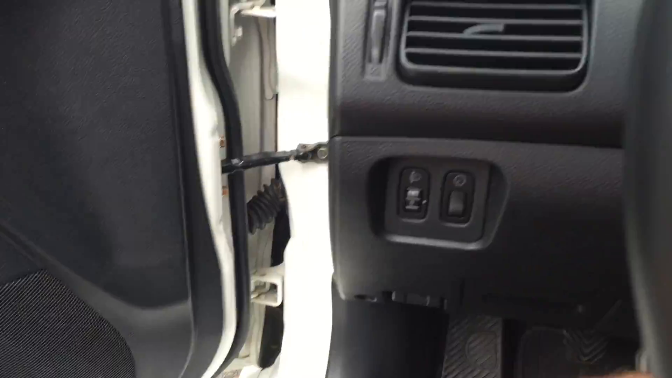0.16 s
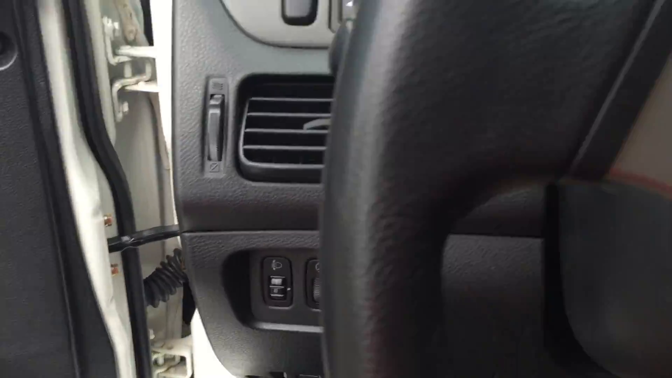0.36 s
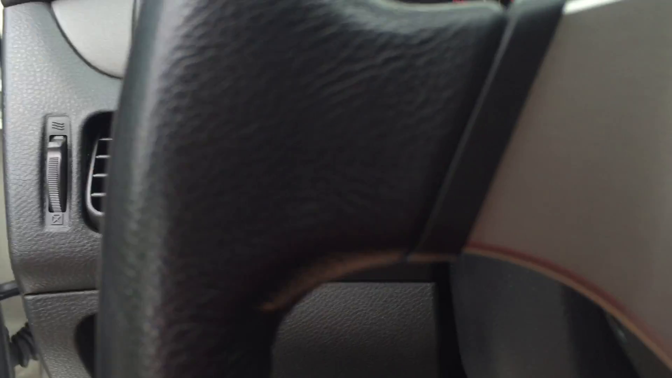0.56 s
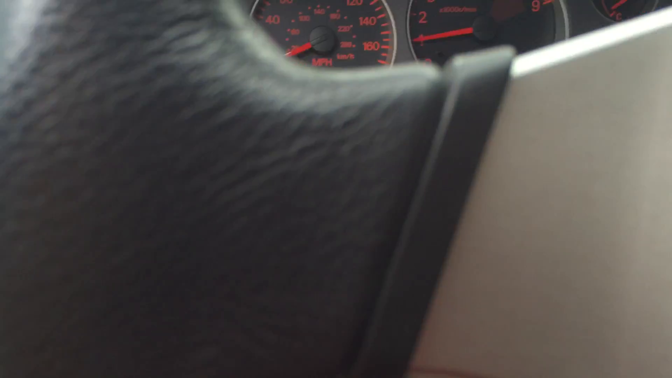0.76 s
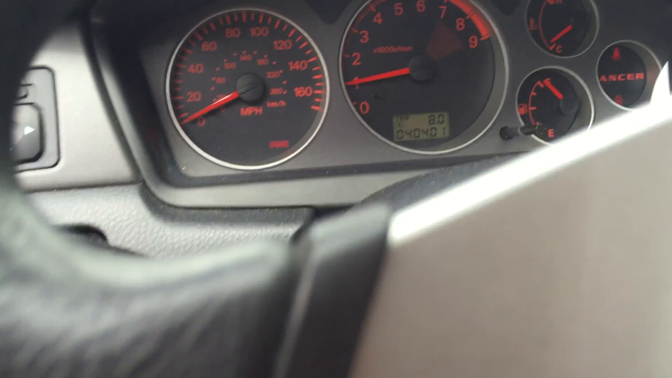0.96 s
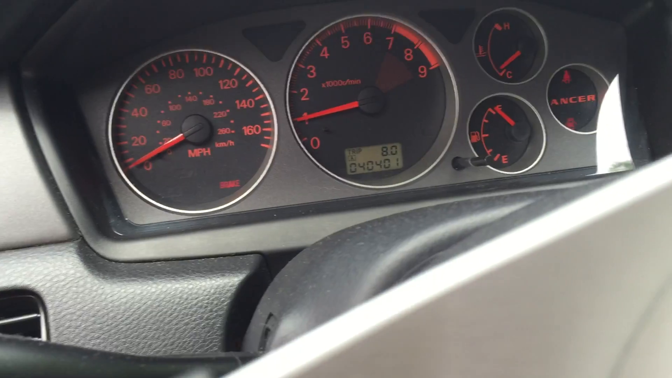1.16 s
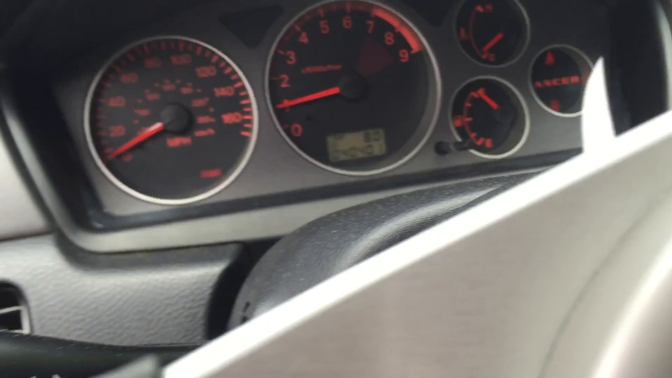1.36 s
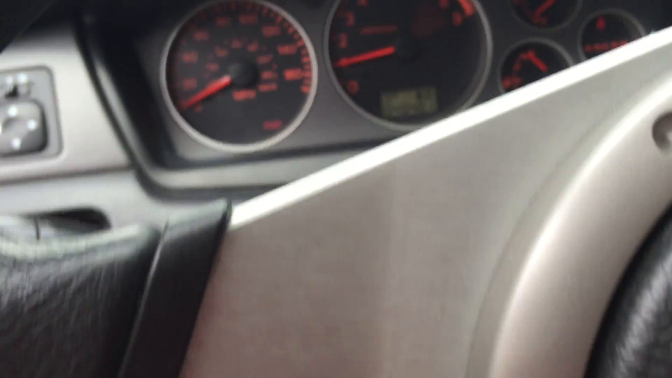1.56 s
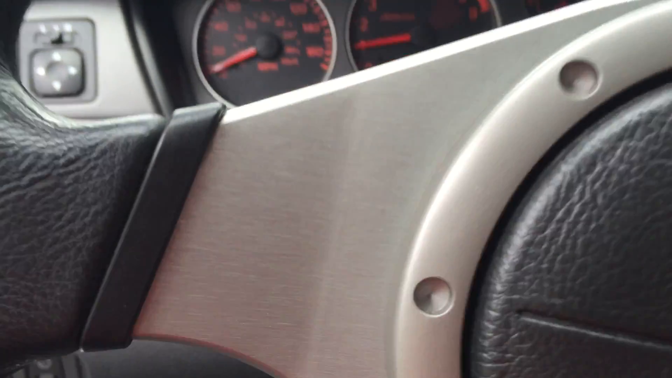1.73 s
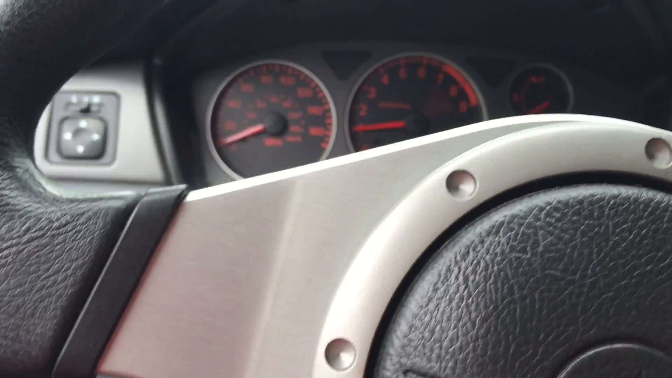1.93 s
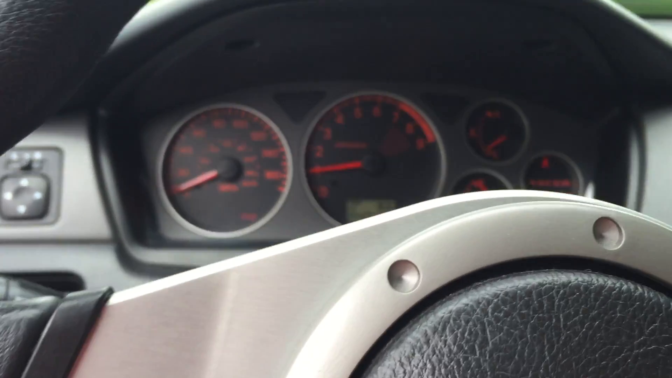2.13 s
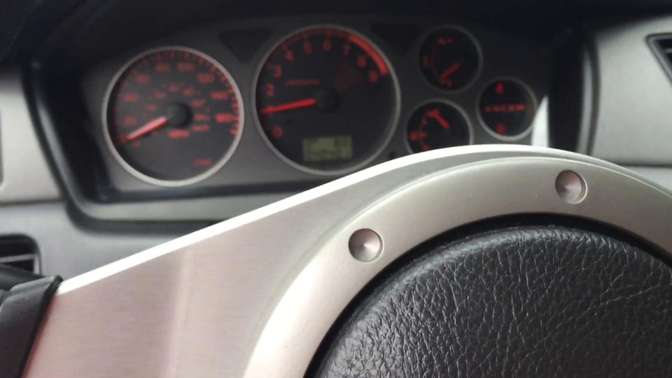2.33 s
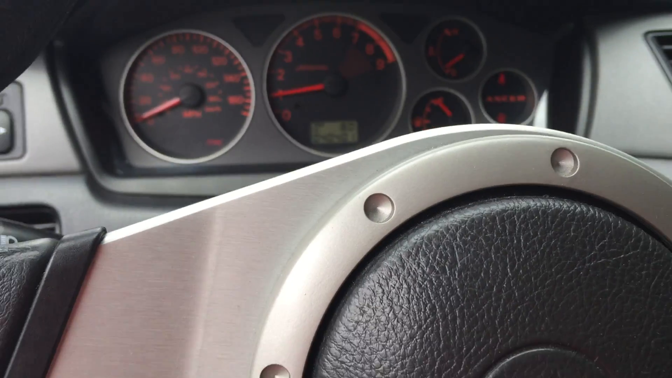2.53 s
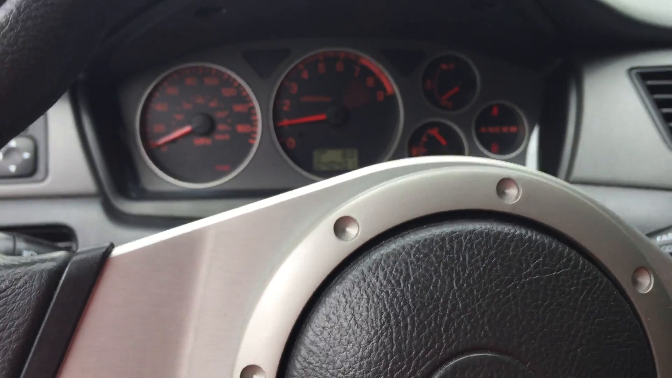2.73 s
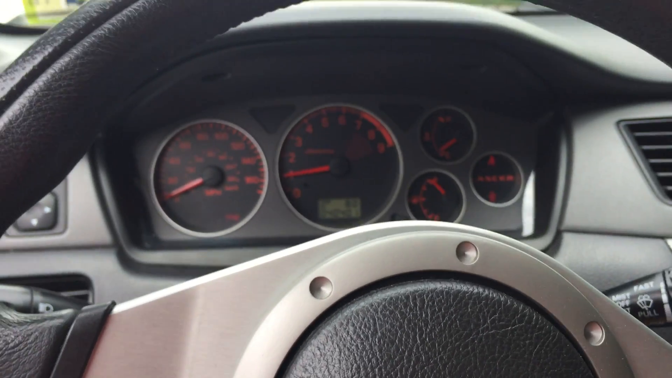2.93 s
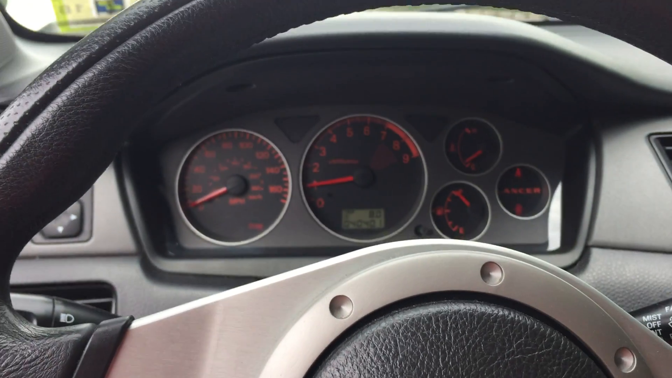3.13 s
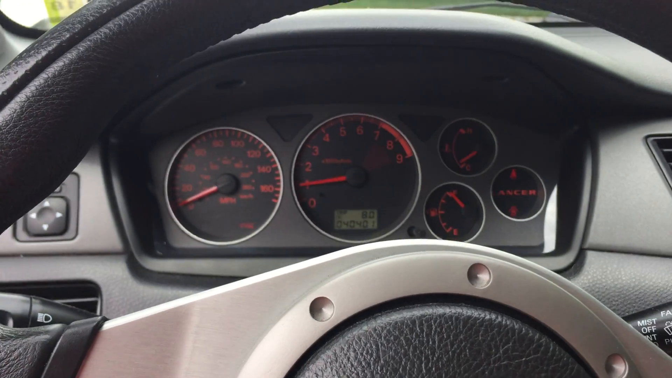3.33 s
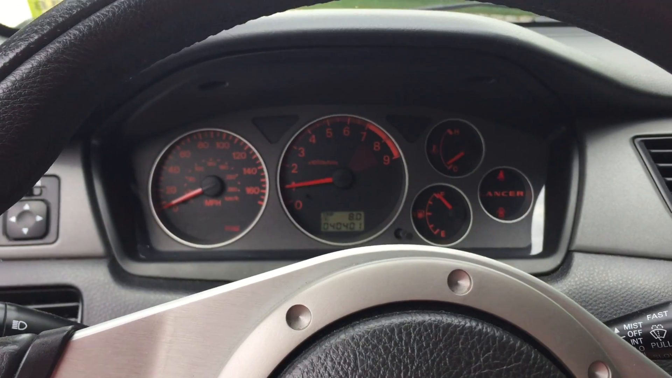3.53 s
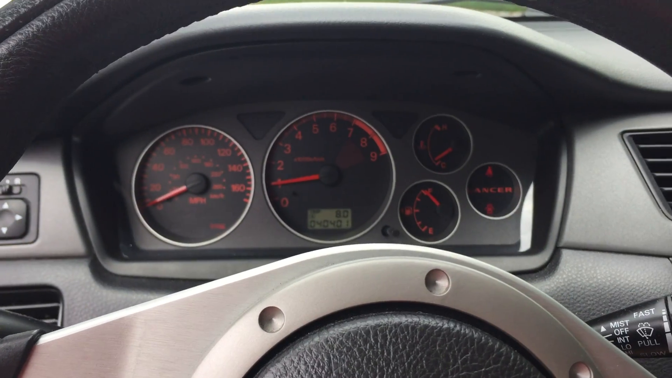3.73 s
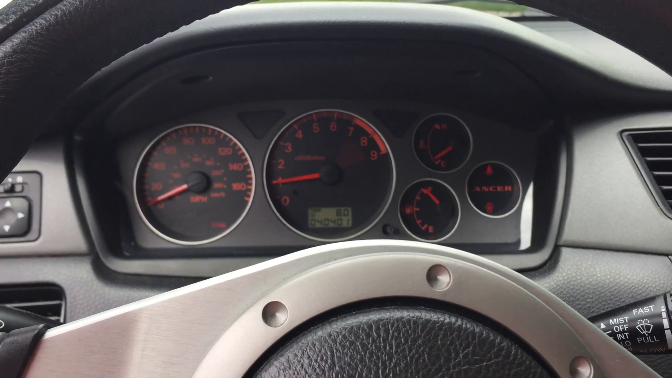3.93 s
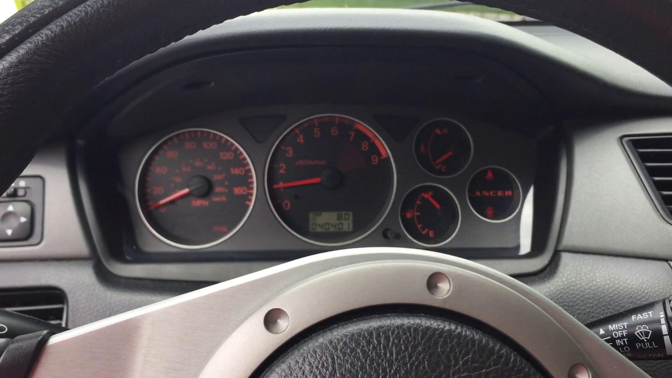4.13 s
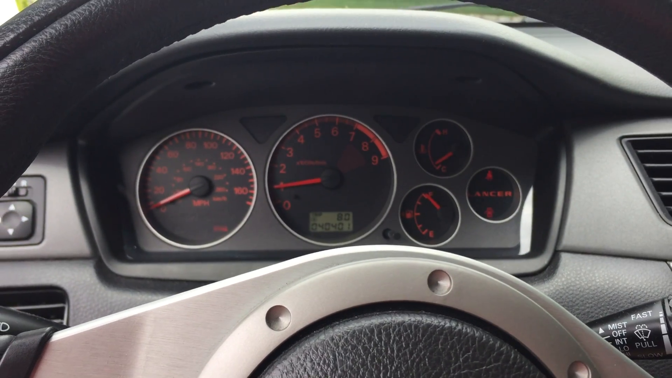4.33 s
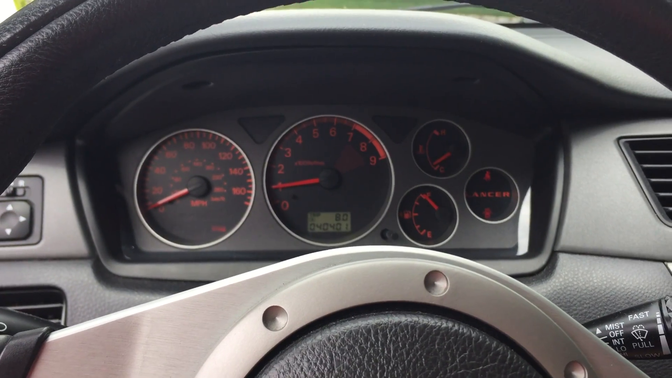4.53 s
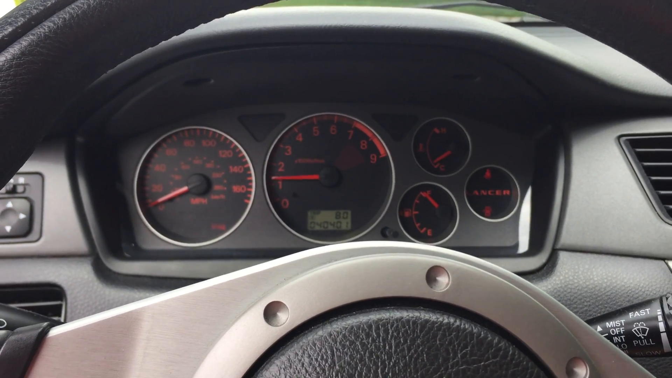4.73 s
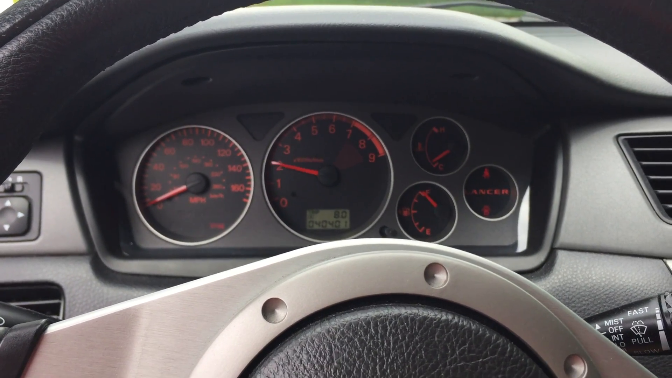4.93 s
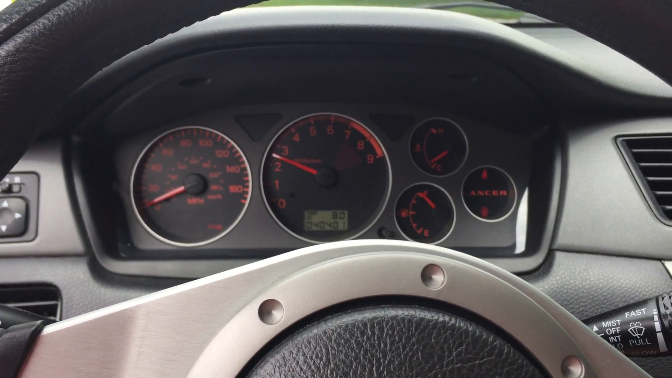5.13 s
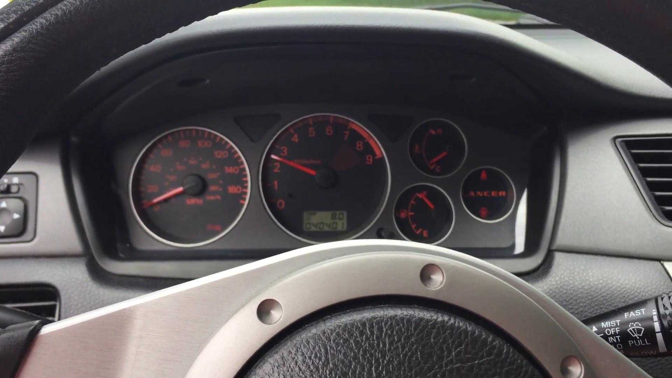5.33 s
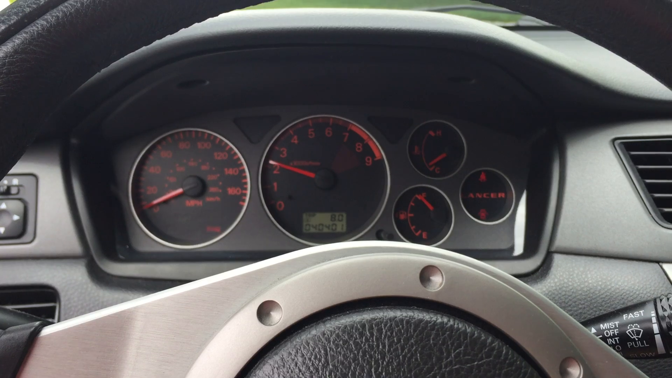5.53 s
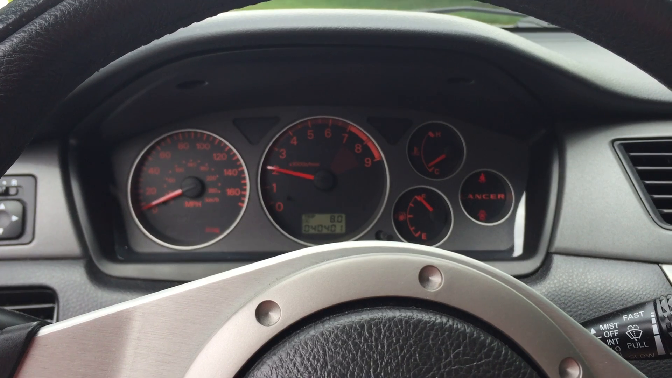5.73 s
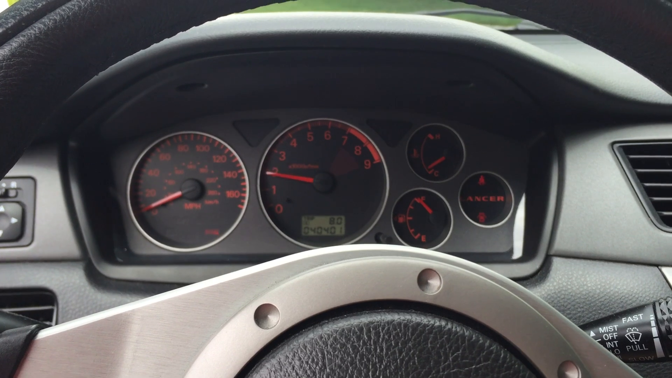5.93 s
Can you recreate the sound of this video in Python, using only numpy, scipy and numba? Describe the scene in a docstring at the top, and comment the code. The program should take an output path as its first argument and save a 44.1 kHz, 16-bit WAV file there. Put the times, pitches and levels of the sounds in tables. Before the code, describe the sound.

A turbocharged four-cylinder idles, heard in mono by a phone moving from the open door to the driver's seat. At 0 s the mechanical rush is strongest, with a low seat thud at about 0.05 s, cloth rustle and bright scuffs at 0.3-0.4 s. The idle is a lumpy bass throb near 31 pulses a second, with grainy thin whine, faint hum and panel ring. Small knocks and rubbing come and go, busiest from 1.8 to 2.8 s, then sparse, with one knock near 4.1 s. At 4.5 s the throttle opens: pitch sweeps up about threefold by 5.1 s, growling and booming, with intake hiss, harsh clatter and trim buzz. As it shuts, a wide soft hiss vents until about 5.5 s while revs sink in a hollow, burbling boom. Around 5.9 s a second, lighter blip begins, swelling with bass as the sound cuts off near 6.1 s.

```python
"""A turbocharged four-cylinder idles, is blipped, and climbs again at the end, heard from the driver's seat, door open.
Uneven firing pulses excite exhaust and cabin resonances, and a sine booms at the firing rate; tones locked to
engine speed whine, and pulsed noise makes the valve-gear rush and trim buzz. Filtered noise makes the intake hiss
and venting boost. The driver settles with a low sine thud, cloth rustle and short noise ticks."""
import sys
import numpy as np
from scipy import signal
from scipy.io import wavfile
from scipy.ndimage import uniform_filter1d
from numba import njit

SR = 44100
rng = np.random.default_rng(int(sys.argv[2]) if len(sys.argv) > 2 else 0)


def inscribe(sig):
    """Save sig as 16-bit PCM at rate SR to the path in sys.argv[1].

    A 1-D sig is mono; a 2-D sig holds one channel per row.
    Samples are clipped to [-1, 1] before scaling.
    """
    pcm = np.round(np.clip(np.atleast_2d(sig).T, -1, 1) * 32767)
    wavfile.write(sys.argv[1], SR, pcm.astype(np.int16))


N = 267687  # samples
IDLE_HZ = 30.7  # firing rate at idle
OPEN_S = 0.16  # rise and fall time of throttle load and intake flow

# throttle blips: opens t/s, starts to shut t/s, depth/0-1
BLIPS = [(4.492, 5.07, 0.92), (5.904, 6.3, 0.67)]


def undb(db):
    """Level to amplitude: 20 dB is a factor of ten."""
    return 10 ** (np.asarray(db) / 20)


def curves(table):
    """Linear interpolation in time of every column after the first."""
    s, *columns = np.transpose(table)
    return [np.interp(np.arange(N) / SR, s, c) for c in columns]


@njit
def svf(x, hz, width):
    """State-variable filter: two coupled integrators give low-pass and band-pass with a moving centre."""
    low, band, b, l = np.empty(len(x)), np.empty(len(x)), 0., 0.
    for i in range(len(x)):
        g, k = np.tan(np.pi * hz[i] / SR), width[i] / hz[i]
        v = (b + g * (x[i] - l)) / (1 + g * (g + k))
        low[i], band[i] = l + g * v, k * v
        b, l = 2 * v - b, l + 2 * g * v
    return low, band


def band(x, hz, width):
    """Damped resonance at a fixed frequency, gain 1 at the centre."""
    return svf(x, np.full(len(x), 1. * hz), np.full(len(x), 1. * width))[1]


def band_twice(x, hz, width):
    """Two equal resonances in cascade, for steeper skirts."""
    return band(band(x, hz, width), hz, width)


def walk(rate):
    """Random modulation: levels held 1 / rate s and smoothed twice; spread near 1."""
    k = int(SR / rate)
    held = np.repeat(rng.standard_normal(N // k + 5), k)
    smooth = uniform_filter1d(uniform_filter1d(held, k), k)
    return 1.51 * smooth[2 * k:2 * k + N]


def colour(points, flicker_db):
    """Spectral shaping: narrow noise bands that flicker independently, summed to rms 1."""
    hz, db = np.transpose(points)
    total = 0
    for f in hz[0] * 2 ** np.arange(0, np.log2(hz[-1] / hz[0]), 1 / 5):
        noise = band_twice(rng.standard_normal(N), f, f / 4)
        level_db = np.interp(np.log(f), np.log(hz), db) + flicker_db * walk(9)
        total = total + undb(level_db) * noise
    return total / np.std(total)


def beat(hz, depth):
    """Amplitude modulation that swells once a period of the given rate."""
    return 1 + np.clip(depth, 0, 1) * np.cos(2 * np.pi * (np.cumsum(hz) / SR + 0.21))


def gate(start, end, edge_s):
    """Linear envelope 0-1: rises from the start, holds, falls after the end."""
    t = np.arange(N) / SR
    return np.clip(np.minimum(t - start, end + edge_s - t) / edge_s, 0, 1)


def panels(x):
    """Modal resonance: dash and bulkhead ring as a parallel bank of modes."""
    # f/Hz, width/Hz, gain/dB
    modes = [(419, 12, -2), (559, 22, 1), (638, 11, 4), (725, 8.1, 2), (1000, 17, -13.5), (1090, 17, -21),
             (1136, 13, -4), (1366, 36, -4), (1477, 67, -0.5), (1666, 49, 0.5), (1777, 45, -1.5),
             (1908, 21, -1.5), (2250, 19, -12), (2310, 19, -10), (2497, 22, -3.5), (3467, 17, -10),
             (4090, 38, -18.5)]
    return sum(undb(db) * band(x, f, w) for f, w, db in modes)


@njit
def fire(hz, stretch, size, p):
    """Phase accumulation: a pulse at each wrap, every period with its own rate factor and strength."""
    pulses, k = np.zeros(len(hz)), 0
    for i in range(len(hz)):
        p += hz[i] * stretch[k] / SR
        if p >= 1:
            p, k = p - 1, k + 1
            pulses[i] = size[k]
    return pulses


def exhaust(hz, boom_db, tones_db):
    """Source and resonator: firings ring pipe and cabin; the swing of gas flow booms at the firing rate."""
    # cylinders in firing order: strength/dB, offset of firing rate/fraction
    cylinders = [(0.7, .006), (-0.7, -0.027), (1, .006), (-0.6, -.006)]
    # pipe and cabin resonances: f/Hz, width/Hz, gain/dB
    resonances = [(67.6, 28.3, 6.5), (89.8, 40, -2), (128.7, 59, -10.5), (147.8, 57, -3),
                  (195.2, 25.4, -1.5)]
    firings = N // 400
    rate_chance, strength_chance = rng.standard_normal((firings, 2)).T
    strength_db, offset = np.tile(np.transpose(cylinders), firings)[:, :firings]
    pulses = fire(hz, 1 + offset + 0.0053 * rate_chance, undb(strength_db + 1.1 * strength_chance), 0.529)

    # each blow lasts a fixed crank angle, so it sharpens with speed
    blows = svf(pulses, 3.08 * hz, 4.83 * hz)[0]
    blows = svf(blows, 5.59 * hz, 6.34 * hz)[0]
    # take out the firing rate itself, which the boom supplies
    blows = blows - svf(blows, hz, 1.17 * hz)[1]
    pipe = sum(undb(db) * band(blows, f, w) for f, w, db in resonances)
    # every second firing comes down a shorter runner with a sharper edge: pulses of alternating sign ring a
    # double resonance near 155 Hz
    alternating = pulses * (-1.) ** np.cumsum(pulses > 0)
    pipe = pipe + undb(-17.5) * band_twice(alternating, 154.5, 140)
    # the muffler passes only the bass
    pipe = signal.sosfilt(signal.butter(8, 196, fs=SR, output="sos"), pipe)
    pipe = signal.sosfilt(signal.butter(2, 45, "high", fs=SR, output="sos"), pipe)

    # a running rms of the overtones evens the pipe level before tones_db sets it
    overtones = signal.sosfilt(signal.butter(4, [100, 230], "band", fs=SR, output="sos"), pipe)
    loudness = np.sqrt(uniform_filter1d(uniform_filter1d(overtones ** 2, size=5800), size=2900))

    boom_phase = np.cumsum(hz) / SR + .3 + .015 * walk(25)
    boom = np.sqrt(2) * np.sin(2 * np.pi * boom_phase)
    # off throttle, when the overtones die away, unsteady gas burbles around the boom
    overrun = np.clip((boom_db - tones_db) / 14, .25, 1)
    burble = band_twice(rng.standard_normal(N), 70, 60)
    boom = undb(1.0 * walk(30)) * boom + undb(-11.5) * overrun * burble / np.std(burble)
    return undb(tones_db) * pipe / loudness + undb(boom_db) * boom


def whine(hz):
    """Order tones: gears and belts sing at multiples of the firing rate, heard where the panels resonate."""
    # multiple of the firing rate/1, level at the starting rate before beat and panels/dB
    orders = [(12.35, -72), (18.6, -58), (27.7, -56.5)]
    turns = np.cumsum(hz) / SR
    tones = 0
    for multiple, db in orders:
        level = undb(db + 1.5 * walk(10))
        tones = tones + level * np.sin(2 * np.pi * (multiple * turns + 0.19 * walk(50)))
    tones = tones * (hz / hz[0]) ** 0.8 * beat(hz, 0.21)
    return undb(-3.5) * panels(tones) + undb(2.0) * band_twice(tones, 1176, 260)


def sing(hz):
    """Resonant order tone: grainy, throbs once an engine cycle, leaves its resonance as the engine speeds up."""
    # thin accessory tone at idle: t/s, level/dB
    idle_level = [(0, -72), (.45, -62), (.65, -56), (1.2, -62), (1.95, -58), (2.25, -71), (2.8, -59.5),
                  (3.3, -63.5), (4.4, -66)]
    order, wander_db, drop_db_per_hz = 37.3, 1.2, 8.  # order: multiple of the firing rate
    level_db = curves(idle_level)[0] + wander_db * walk(7.87)
    level_db = level_db - drop_db_per_hz * np.maximum(hz - IDLE_HZ - 1, 0)
    grain = undb(level_db + 2.6 * walk(25.13))
    phase = order * np.cumsum(hz) / SR + .16 * walk(50)
    return grain * beat(hz / 4, .4) * np.sqrt(2) * np.sin(2 * np.pi * phase)


def bay(hz, load):
    """Modulated broadband noise: valve gear, fan and belts rush in pulses and ring the panels."""
    # f/Hz, relative density/dB
    spectrum = [(150, -25), (260, -3), (382, -4), (520, -11.5), (562, -4.5), (722, -11), (787, -13),
                (1160, -11.5), (2600, -34), (3380, -47.5), (5720, -120)]
    # louder near the open door: t/s, gain/dB
    door = [(0, 12), (.2, 4.5), (1.1, 3.5), (1.6, 1), (2.4, 2.5), (3.1, 0.1), (4.4, -1)]
    idle_db, db_per_octave, load_db = -54.5, 6.5, 4.
    level_db = idle_db + db_per_octave * np.log2(hz / IDLE_HZ) + load_db * load + curves(door)[0]
    rush = colour(spectrum, flicker_db=2.5) * beat(hz, 0.13)
    ring = panels(rng.standard_normal(N) * beat(hz, 0.18))
    ring = 0.34 * ring / np.std(ring) * (hz / hz[0]) ** 0.73
    return undb(level_db) * (rush + ring)


def buzz(hz):
    """Forced rattle: noise pulsed once a firing drives two close trim resonances, strongest near top speed."""
    level_db, top_hz, db_per_hz = -40.5, 91.3, 1.2  # full above this firing rate, fading below it
    shake = rng.standard_normal(N) * beat(hz, 0.99) ** 2
    rattle = band_twice(shake, 1120, 70) + .5 * band_twice(shake, 1000, 70)
    return undb(level_db - db_per_hz * np.maximum(top_hz - hz, 0)) * rattle / np.std(rattle)


def rasp(hz):
    """Forced rattle: a higher trim resonance answers over a wider range of speed."""
    level_db, top_hz, db_per_hz = -52, 72., .8  # full above this firing rate, fading below it
    rattle = band_twice(rng.standard_normal(N) * beat(hz, .7) ** 2, 1500, 110)
    level_db = level_db - db_per_hz * np.maximum(top_hz - hz, 0) + 3.0 * walk(14)
    return undb(level_db) * rattle / np.std(rattle)


def clatter_power(hz, load):
    """Impact noise: power grows with engine speed, a little late, and with load."""
    idle_db, db_per_octave, load_db, lag_s = -75, 16.5, 1, .11
    t = np.arange(N) / SR
    late_hz = np.interp(t - lag_s, t, hz)
    return undb(idle_db + db_per_octave * np.log2(late_hz / IDLE_HZ) + load_db * load) ** 2


def intake_power():
    """Turbulent flow noise: the intake hisses under throttle, sagging in level, over a steady floor."""
    floor_db, intake_db, sag_db_per_s = -78, -56.5, -4.
    t = np.arange(N) / SR
    power = undb(floor_db) ** 2
    for opens, shuts, depth in BLIPS:
        intake = undb(intake_db + sag_db_per_s * (t - opens)) * gate(opens, shuts, OPEN_S) ** 2
        power = power + (depth * intake) ** 2
    return power


def vent():
    """Jet noise: boost escapes as wide-band hiss around the shutting of the throttle."""
    gain_db, hold_s, fade_s = -57.5, 0.34, .12
    level = 0
    for _, shuts, _ in BLIPS:
        level = level + undb(gain_db) * gate(shuts - OPEN_S, shuts + hold_s, fade_s) ** 2
    return level * band(rng.standard_normal(N), 9000, 9000)


def rustle_power():
    """Friction noise: cloth and seat rub in short strokes, as powers in a low and an airy colour."""
    # start t/s, length/s, low level/dB, airy level/dB
    strokes = [(-.1, 0.32, -57.5, -66), (0.195, 0.68, -70, -78), (0.776, 0.22, -64.5, -66.5),
               (1.22, 0.12, -78, -73), (1.86, 0.35, -67.5, -73.5), (2.15, 0.29, -68, -65.5),
               (2.447, 0.086, -59, -82), (2.69, 0.27, -66.5, -79), (2.93, .07, -65, -87),
               (3.15, .08, -64, -76)]
    edge_s = 0.045
    low, airy = 0, 0
    for s, length, low_db, airy_db in strokes:
        rub = gate(s, s + length - edge_s, edge_s) ** 2
        low = low + undb(low_db) ** 2 * rub
        airy = airy + undb(airy_db) ** 2 * rub
    return low, airy


def treble(hz, load):
    """Incoherent addition: clatter, intake and rustle add as powers in two noise colours; vent joins them."""
    # low colour, shared by clatter and rustle: f/Hz, relative density/dB
    low_spectrum = [(1290, -21), (2200, 3.5), (2610, -2.5), (3210, -7), (4010, -5.5), (4860, -31.5),
                    (5260, -7), (8500, -25.5), (11000, -48), (18700, -120)]
    # airy colour, shared by intake and rustle: f/Hz, relative density/dB
    airy_spectrum = [(4410, -21.5), (7500, -1), (7930, -20.5), (9200, 2.5), (10500, -13), (11000, -5.5),
                     (14900, -1.5), (15700, -2.5)]
    rustle_low, rustle_airy = rustle_power()
    low = np.sqrt(clatter_power(hz, load) + rustle_low) * colour(low_spectrum, flicker_db=2.5)
    airy = np.sqrt(intake_power() + rustle_airy) * colour(airy_spectrum, flicker_db=2.7)
    return low + airy + vent()


def ticks(events, width, attack_s, ring):
    """Impulsive excitation: decaying noise bursts, of which a share rings on in the panels."""
    out, t = np.zeros(N), np.arange(SR // 4) / SR
    for s, db, hz, t60 in events:
        burst = band_twice(rng.standard_normal(len(t)), hz, width * hz)
        burst = burst * (1 - np.exp(-t / attack_s)) * np.exp(-np.log(1000) * t / t60)
        i = int(s * SR)
        out[i:i + len(t)] += undb(db) * burst / np.max(np.abs(burst))
    return out + ring * panels(out)


def thud():
    """Low-frequency impact: weight lands on the seat as a few sine cycles that swell and fade."""
    start_s, length_s, hz, peak_db = 0.0477, 0.067, 92.5, -24
    t = np.clip(np.arange(N) / SR - start_s, 0, length_s)
    return undb(peak_db) * np.sin(2 * np.pi * hz * t) * np.sin(np.pi * t / length_s)


def driver():
    """Contact transients: knocks of seat and trim, bright scuffs, and the bump on the seat."""
    # t/s, peak level before panel ring/dB, centre f/Hz
    knock_table = [(0.742, -47, 1500), (0.795, -46.5, 1800), (1.072, -51, 1700), (1.799, -44, 800),
                   (1.846, -53, 2500), (1.939, -47.5, 2100), (2.034, -42, 1000), (2.106, -43, 1100),
                   (2.228, -50, 1900), (2.416, -51.5, 1800), (2.471, -48.5, 2000), (3.33, -47, 1900),
                   (4.061, -44, 1300)]
    # t/s, peak level of low colour/dB, peak level of high colour/dB, t60/s
    scuff_table = [(.317, -51, -49, 0.067), (0.396, -49, -52, 0.15), (.796, -65, -63, .08),
                   (1.089, -59, -65, .09), (2.452, -60, -53, 0.057), (2.789, -55.5, -60, 0.057)]
    # centres of the low and high scuff colours: f/Hz
    scuff_centres = (5900, 13300)
    knock_t60_s = 0.087
    knocks = [(s, db, hz, knock_t60_s) for s, db, hz in knock_table]
    scuffs = []
    for s, *levels, t60 in scuff_table:
        for db, hz in zip(levels, scuff_centres):
            scuffs.append((s, db, hz, t60))
    return ticks(knocks, 1.3, 0.00026, 1.7) + ticks(scuffs, 0.68, 0.0032, .01) + thud()


def hum():
    """Steady tones: thin sines waver a little in level and phase and do not follow the engine."""
    # f/Hz, level/dB
    tones = [(425, -72.5), (640, -68), (732, -68), (1556, -75)]
    t = np.arange(N) / SR
    out = 0
    for hz, db in tones:
        level = undb(db + 3.2 * walk(6)) * np.sqrt(2)
        out = out + level * np.sin(2 * np.pi * (hz * t + 0.31 * walk(12)))
    return out


def rumble():
    """Structural resonance: the body shell shudders as low-band noise below the firing tones."""
    low = band(rng.standard_normal(N), 28, 36)
    return undb(-61.5) * low / np.std(low)


def scene():
    """Superposition: engine, accessories and driver add in one channel."""
    # t/s, firing rate f/Hz, boom level at the firing rate/dB, firing overtone level/dB
    engine_course = [(0, 30.65, -38.5, -31), (2, 30.7, -57.5, -32), (4.46, 31.01, -52, -31.5),
                     (4.518, 30.45, -48, -29), (4.6, 39.36, -46, -24), (4.652, 45.83, -25.5, -27.5),
                     (4.772, 60.4, -16.5, -19), (4.83, 67.4, -15.5, -23), (4.92, 78.6, -17.5, -23),
                     (4.98, 84.17, -24.5, -24.5), (5.096, 92.5, -25, -26), (5.164, 90.4, -18, -29),
                     (5.3, 82.8, -17, -40), (5.45, 74.15, -15, -40.5), (5.515, 71.5, -22, -32),
                     (5.61, 67.06, -16.5, -30.5), (5.72, 62.16, -19.5, -30.5), (5.76, 60.34, -21.5, -34.5),
                     (5.82, 58.43, -19.5, -40.5), (5.9, 53.36, -24, -33.5), (5.98, 57.3, -24, -24.5),
                     (6.07, 62.7, -13, -21)]
    hz, boom_db, tones_db = curves(engine_course)
    load = sum(depth * gate(opens, shuts, OPEN_S) for opens, shuts, depth in BLIPS)
    engine = exhaust(hz, boom_db, tones_db) + whine(hz) + sing(hz) + bay(hz, load)
    trim = buzz(hz) + rasp(hz)
    return (engine + trim + treble(hz, load) + driver() + hum() + rumble())[None, :]


def record(dry):
    """Band limiting: the phone cuts the top with a steep elliptic low-pass."""
    top_hz = 15800
    return signal.sosfilt(signal.ellip(10, .2, 80, top_hz, fs=SR, output="sos"), dry)


dry = scene()
out = record(dry)
inscribe(out)
```